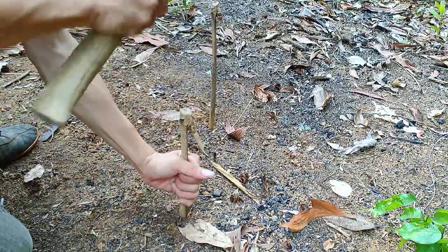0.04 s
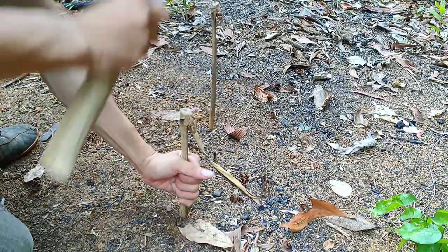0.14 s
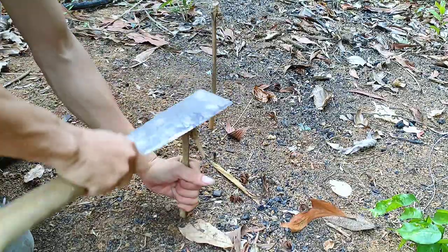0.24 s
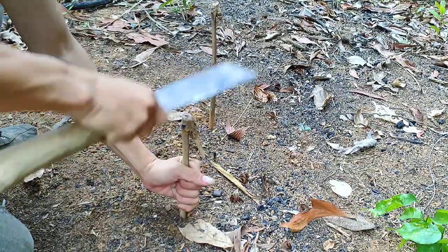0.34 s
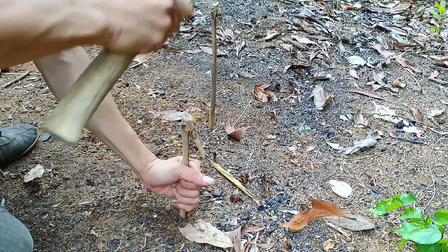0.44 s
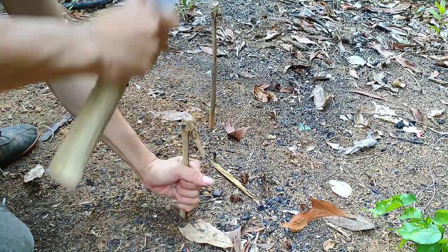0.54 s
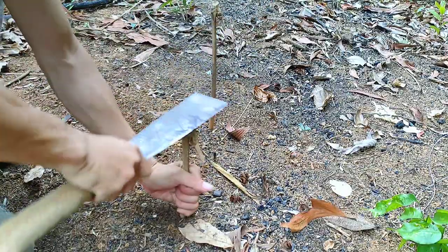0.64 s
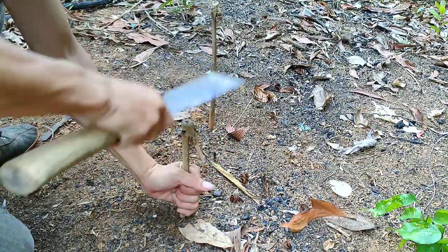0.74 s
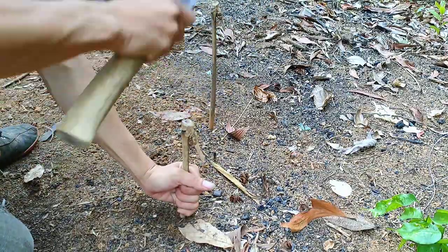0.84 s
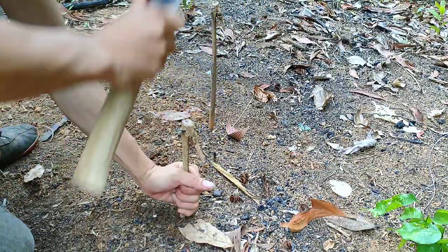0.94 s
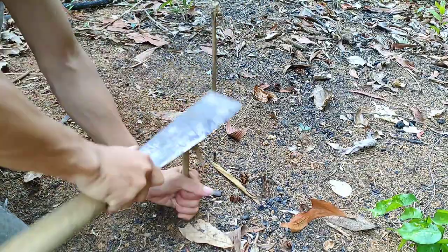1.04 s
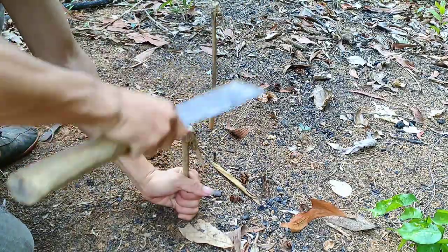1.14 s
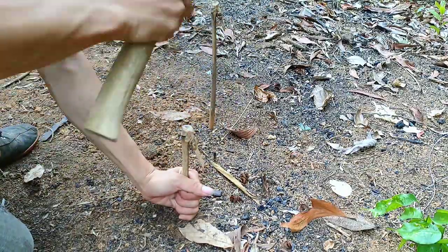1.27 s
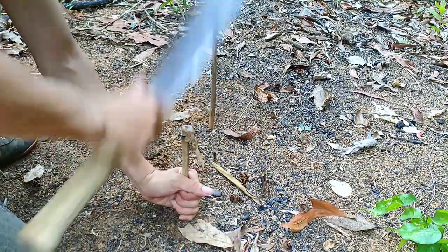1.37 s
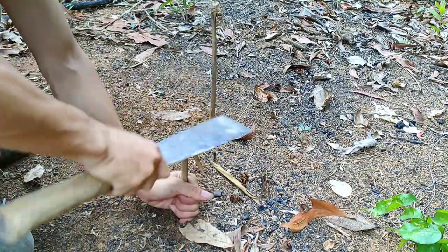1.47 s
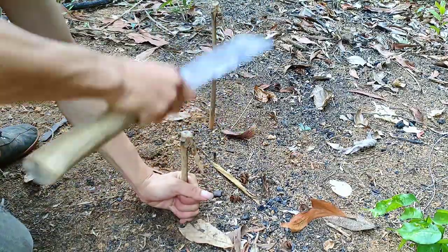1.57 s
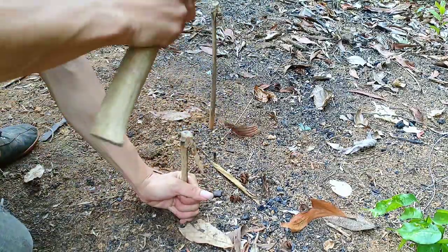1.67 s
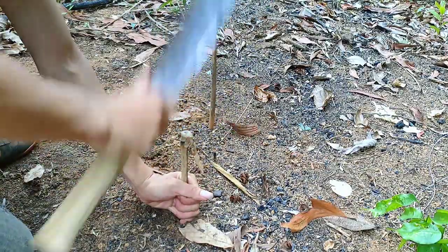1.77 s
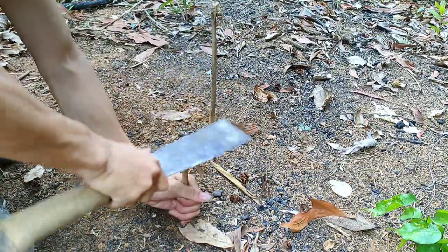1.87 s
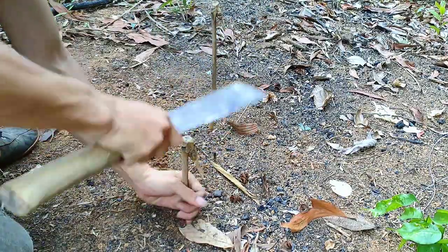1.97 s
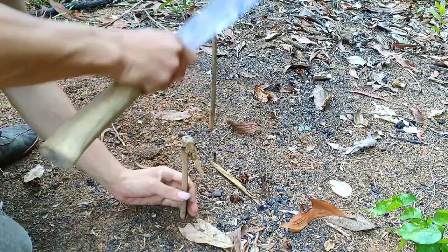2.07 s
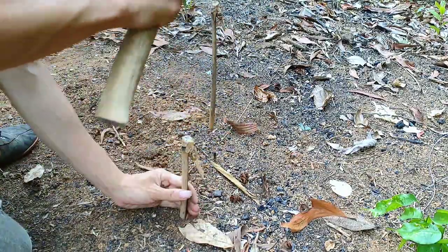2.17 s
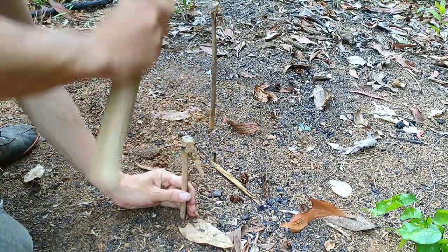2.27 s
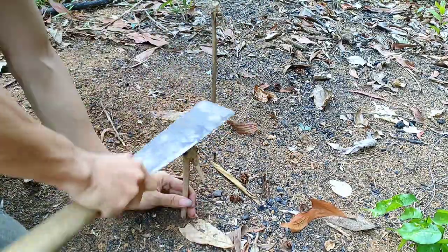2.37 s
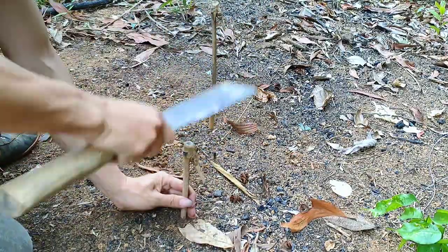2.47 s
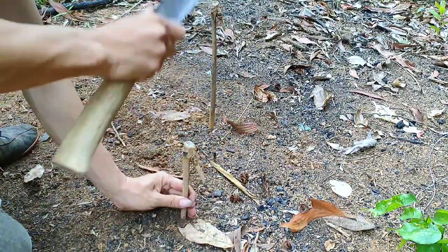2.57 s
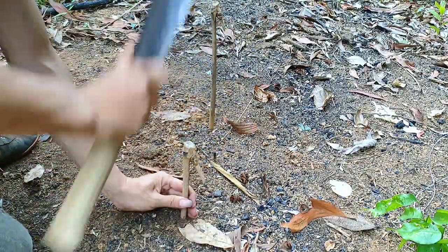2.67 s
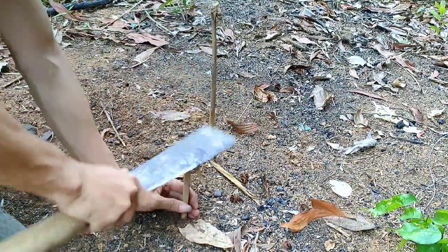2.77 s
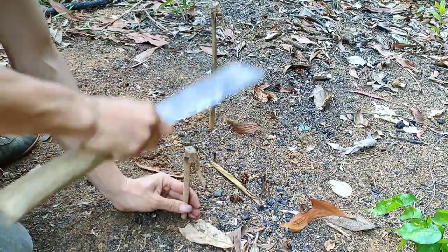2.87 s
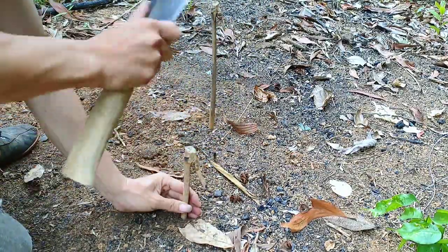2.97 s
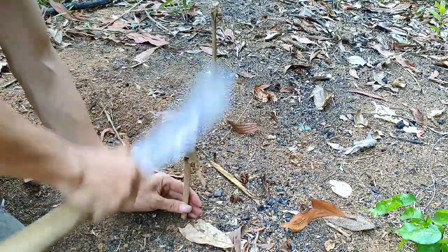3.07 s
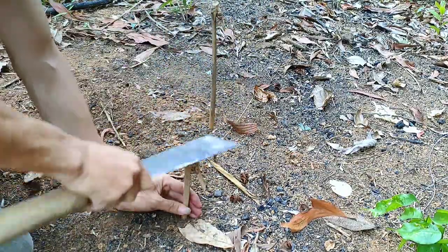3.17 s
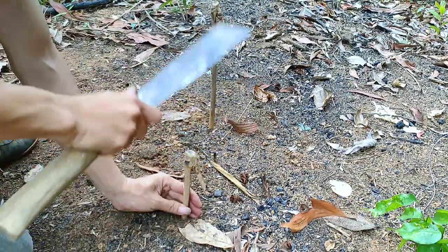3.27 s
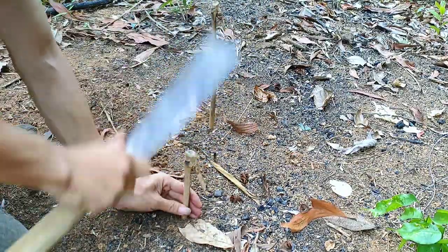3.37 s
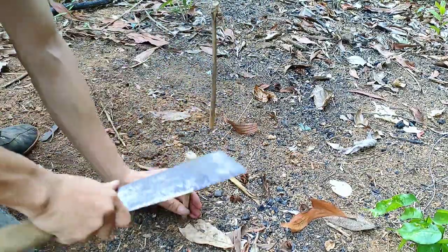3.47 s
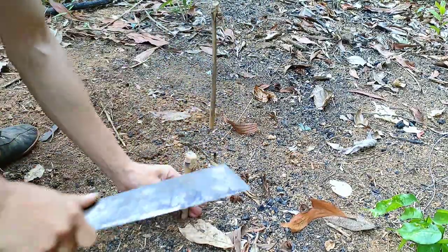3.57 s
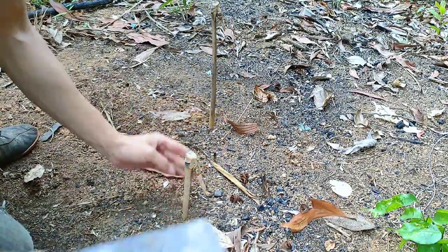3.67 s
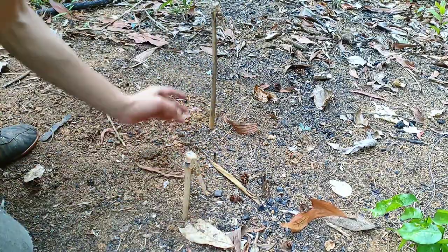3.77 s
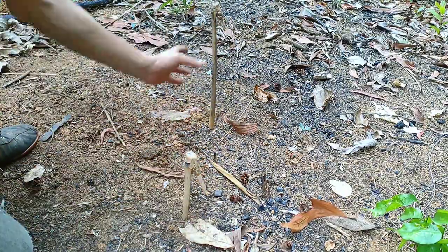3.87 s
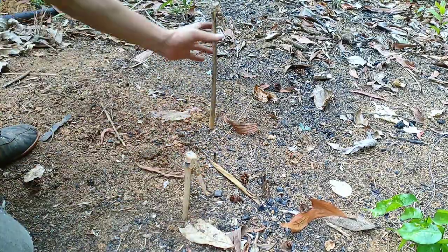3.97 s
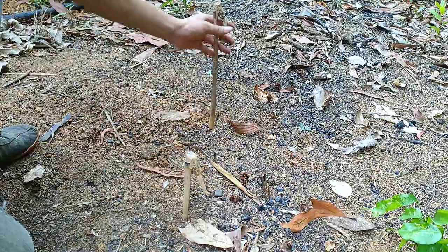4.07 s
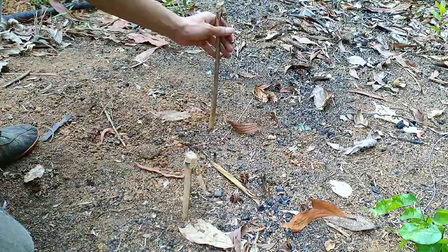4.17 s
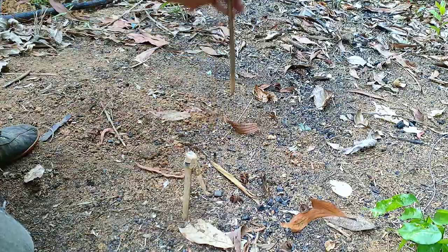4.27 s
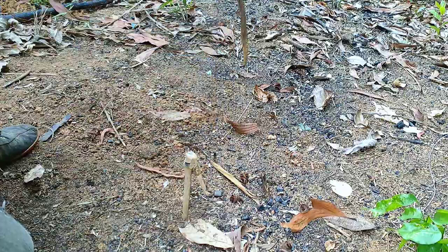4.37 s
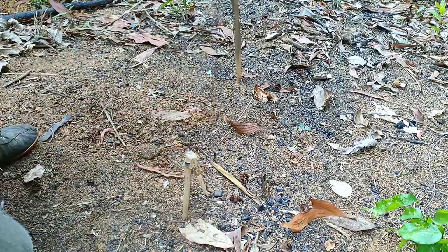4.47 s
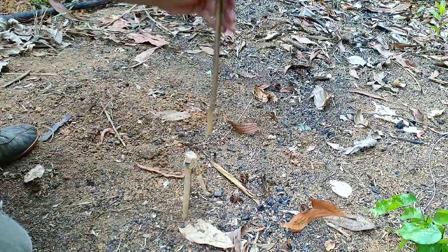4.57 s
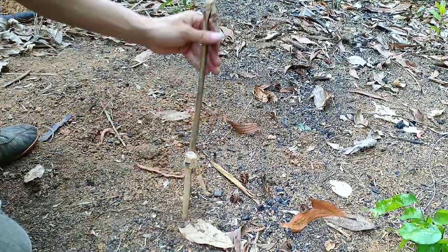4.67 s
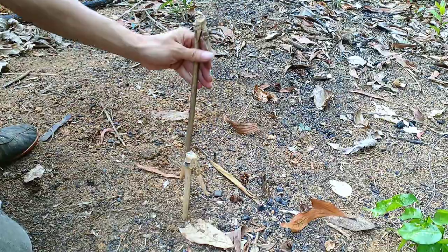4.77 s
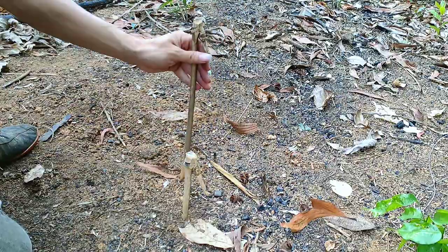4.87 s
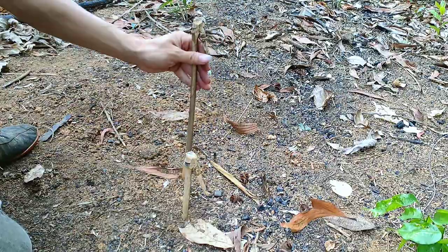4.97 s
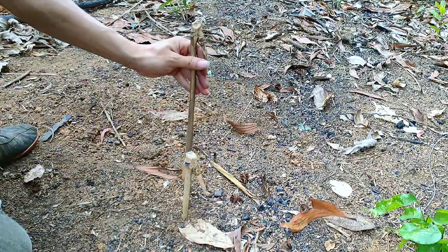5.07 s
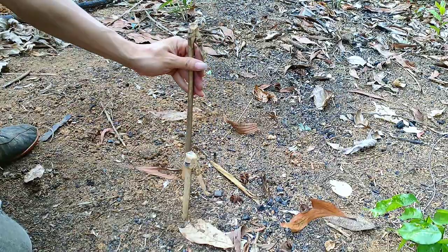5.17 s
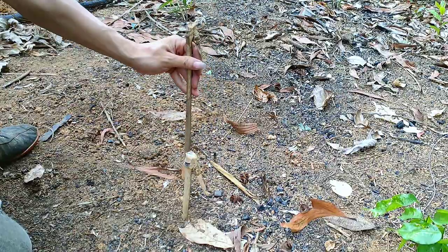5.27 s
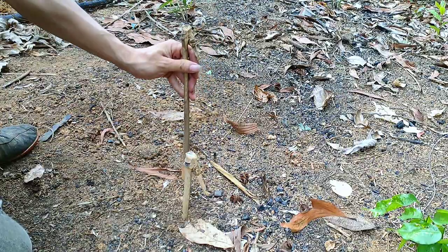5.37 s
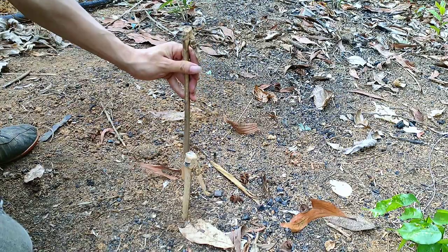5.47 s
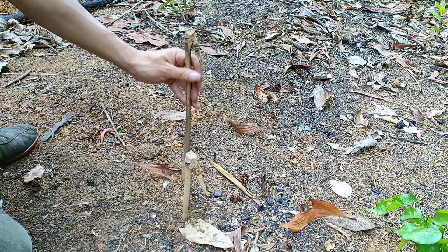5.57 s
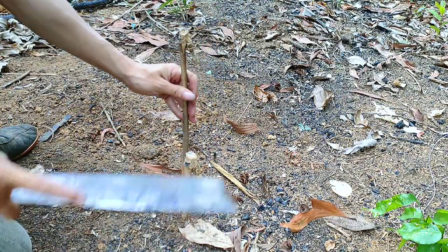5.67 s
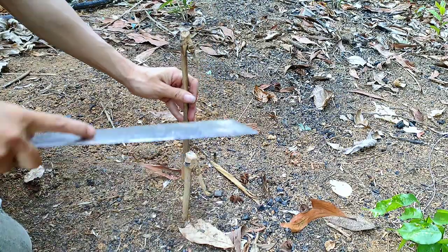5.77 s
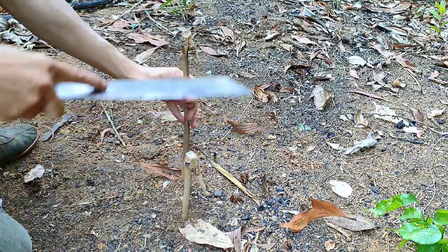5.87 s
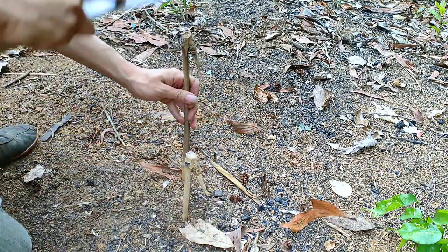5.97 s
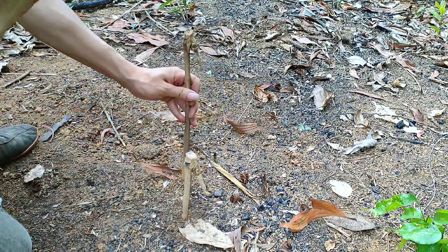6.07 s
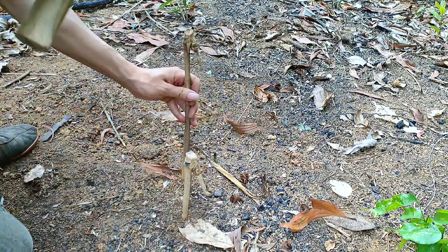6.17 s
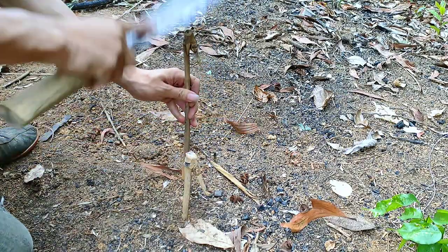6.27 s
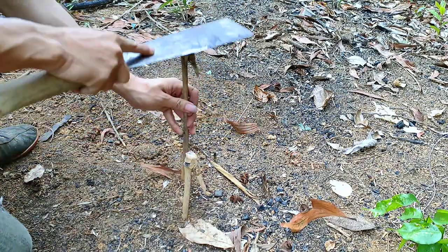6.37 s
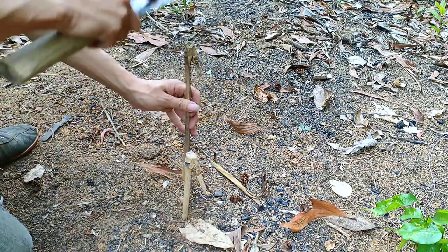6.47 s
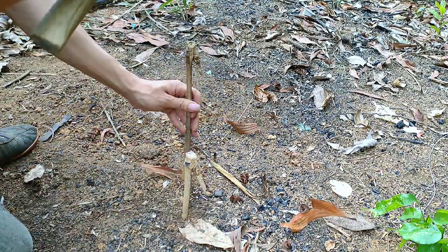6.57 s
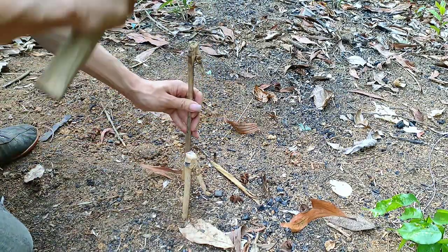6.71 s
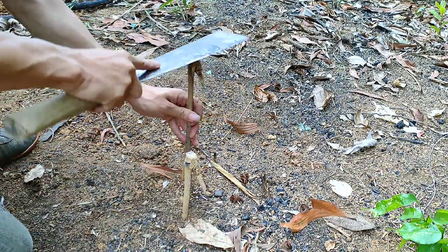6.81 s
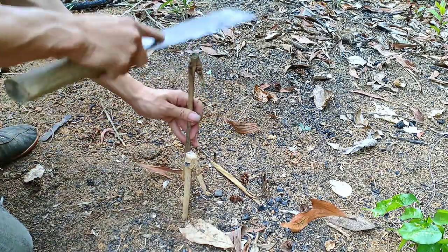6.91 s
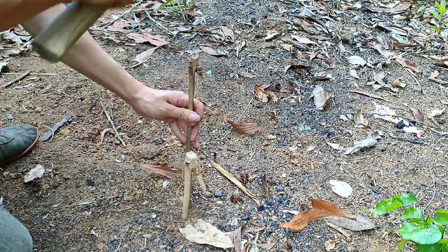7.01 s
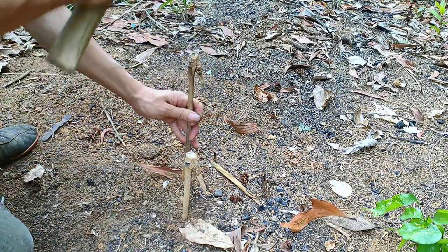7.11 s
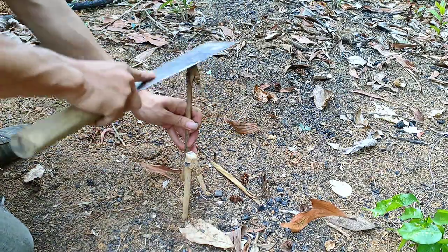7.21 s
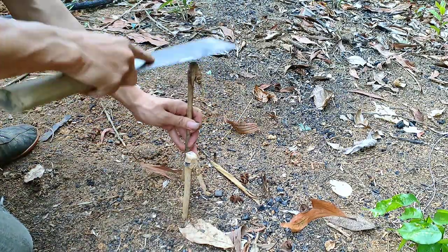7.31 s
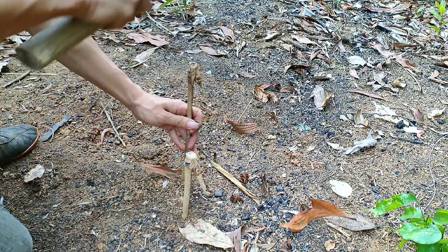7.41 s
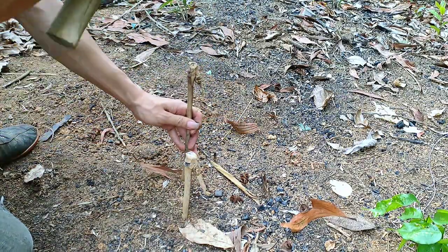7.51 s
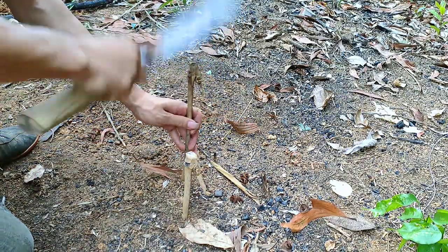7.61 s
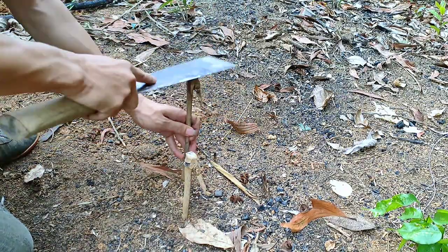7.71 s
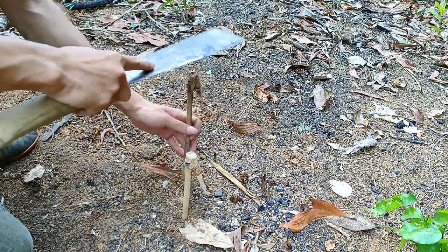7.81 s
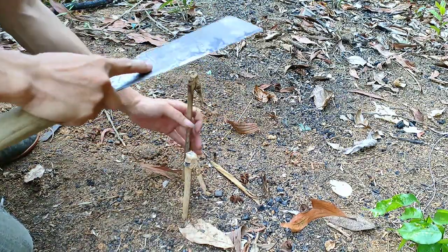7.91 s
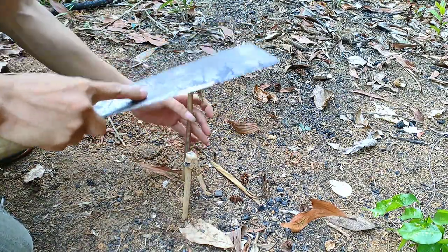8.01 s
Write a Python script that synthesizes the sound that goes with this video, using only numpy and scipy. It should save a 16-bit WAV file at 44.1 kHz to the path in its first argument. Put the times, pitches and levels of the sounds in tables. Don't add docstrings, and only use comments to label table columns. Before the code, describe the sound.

Sharp wooden knocks as a blade's flat drives thin stakes into soil, with quick woodland echo over steady chirring insects and a faint distant bird.

```python
import sys
import numpy as np
from scipy import signal
from scipy.fft import rfft
from scipy.io import wavfile
from scipy.ndimage import uniform_filter1d

SR = 44100
rng = np.random.default_rng(int(sys.argv[2]) if len(sys.argv) > 2 else 0)


def generate_wav(signal):
    frames = np.transpose(np.atleast_2d(signal))
    scaled = np.clip(frames, -1, 1) * 32767
    pcm = np.round(scaled).astype(np.int16)
    wavfile.write(sys.argv[1], SR, pcm)


def boost_factor(decibels):
    exponent = np.asarray(decibels, float) / 20
    return 10 ** exponent


N = 355005

# (time [s], peak [dB], stake tone [Hz], weight [dB], flatness of the landing [dB])
BLOWS = [(0.3112, -5, 1765, 6.5, 6), (0.7132, -2.5, 2150, 2.5, 5), (1.1169, -6, 2270, -16.5, 7),
         (1.5122, -2.5, 2004, -6, 17.5), (1.9175, -3, 4107, -6, 7.5), (2.4554, -3.5, 2278, -25.5, 17.5),
         (2.8362, -3.5, 3060, -31, 13), (3.2002, -3, 2420, 0.5, 13), (3.5145, -5.5, 2120, -18.5, 12),
         (6.3997, -2.5, 1300, -6, -10), (6.8721, -1, 1484, -7, -5.5), (7.2976, -3, 3760, -20, 9),
         (7.7316, -2, 3800, -12.5, 9)]
# (time before the start [s], level [dB])
EARLIER_BLOW = (.1, -15.5)
# (thud [dB], slap [dB], echo [dB], far echo [dB], air push left [dB], air push right [dB])
STAKES = [
    (-21.5, -21, -1.5, -51.5, -27.5, -36),
    (-24, -19, -23, -39, -54.5, -60),
]
# (frequency [Hz], level per weight [dB/dB], level per flatness [dB/dB], extra on long stake [dB])
LANDING = [(300, 1, 0, -0.5), (1300, -0.22, 0.48, 4), (2596, -0.17, 0.46, 8), (4810, 0, 0.42, 5),
           (8200, -0.5, 0.05, 0), (13000, 0, 1, 5.5)]
# (frequency [Hz], level [dB])
CRACK = [(90, -21), (300, -12), (1100, -9), (2400, -6.5), (4800, -1.5), (8000, -2.5), (9800, -10.5),
         (11500, -26.5), (15000, -24.5), (16800, -44.5)]
# (frequency [Hz], level [dB], decay t60 [s])
HELD_STEEL = [
    [(970, -47, .09), (1378, -47, .06), (4570, -32, .1), (5443, -40, .04), (6315, -42, .05),
     (7270, -38, .05), (8335, -33, .05), (9520, -36, .02), (10660, -54, .08)],
    [(970, -44, .06), (1310, -30, .04), (1507, -46, .08), (2800, -36, .03), (4570, -46, .08),
     (6342, -38, .03), (7270, -40, .04), (8325, -37, .045), (9464, -38, .015)],
]
# (frequency [Hz], level [dB])
ECHO = [(500, -48), (900, -33), (2400, -1.5), (3800, -4.5), (7100, -1.5), (8500, -1.5), (9800, -7.5),
        (11000, -21), (15300, -20.5), (15900, -59)]
# (time [s], peak [dB], brightness [dB], ring [dB])
BOUNCES = [(0.355, -37.5, -1, -38), (0.75, -36, -10, -42), (0.768, -45, -10, -27), (1.17, -35, -28, -13),
           (1.5676, -30.5, -1, -19), (1.9864, -36, -23, -10), (2.894, -37, -10, -25), (3.573, -60, 2, -15),
           (5.543, -43, 2, -19), (6.43, -35, 7.5, -23.5), (7.344, -43.5, -18, -20), (7.8, -43, -16, -32)]
# (time [s], peak [dB], scrape t60 [s], ring [dB], thud [dB])
TOUCHES = [
    (3.8989, -29, 0.053, -7.5, 4.5),
    (3.907, -34, 0.013, 1.5, -1),
    (4.0408, -27.5, 0.0283, -6, 2.5),
    (4.106, -49, 0.023, -5, 13),
    (5.486, -45.5, 0.02, -10, -3),
    (5.5076, -47.5, 0.034, -9, 2),
    (5.5491, -49, 0.036, -19, -3),
]
# (frequency [Hz], level [dB], decay t60 [s])
FREE_STEEL = [(2750, -34, 0.19), (3270, -12, 0.018), (4544, -12, 0.072), (5310, -18, 0.11),
              (6100, -19, 0.074), (7267, -7, 0.12), (8335, -0.5, 0.13), (9500, -20, .05),
              (10900, -12, 0.07), (12000, -15, 0.11), (13430, -13, 0.045), (14750, -11, 0.05)]
# (time [s], peak [dB])
TICKS = [(4.6823, -41.5), (4.995, -48.5), (5.216, -42), (6.0251, -44), (6.0943, -44.5), (6.111, -41)]
# (time [s], hold [s], level [dB])
RUSTLE = [(2.066, .03, -53.5), (2.306, 0.07, -64.5), (4.13, 0.018, -66.5), (4.288, 0.017, -61.5),
          (4.58, .015, -64.5), (4.683, 0.022, -61), (4.887, 0.046, -59.5), (5.015, 0.1, -59),
          (5.169, 0.022, -61), (5.209, 0.007, -51.5), (5.33, 0.011, -77), (5.431, .13, -57),
          (5.632, 0.13, -62), (5.795, 0.13, -67), (5.995, .015, -70), (6.083, .03, -63),
          (6.285, 0.018, -64), (6.678, 0.16, -67)]
# (frequency [Hz], level [dB])
LEAF = [(1500, -18), (4000, -5), (8500, 3), (12000, -4.5), (15300, 0.5), (15800, -55)]
# (time [s], hold [s], held note [Hz], rise [Hz], level [dB])
BIRD = [
    (2.411, 0.038, 2930, -0.5, -53.5),
    (2.982, 0.046, 2853, 1899, -58),
    (4.714, 0.12, 2630, 2510.5, -65.5),
    (6.708, .006, 2960, 1556.5, -57),
    (7.23, 0.067, 2936, -0.5, -53.5),
]
# (start [s], loudest stroke [s], end [s], level [dB])
CRICKET = [(1.688, 1.897, 2.5, -70.5), (2.082, 2.345, 2.4, -74), (3.597, 3.771, 3.95, -70.5),
           (4.0, 4.579, 4.86, -68), (5.798, 5.971, 6.42, -66.5), (6.46, 6.831, 7.2, -66.5)]
# (frequency [Hz], width [Hz], level [dB], left over right [dB])
CHOIR = [(7148, 140, -62, -8.5), (7438, 700, -57.5, -5.5), (7785, 150, -62.5, -4), (6920, 780, -63, -3.5),
         (4830, 830, -68.5, -5), (5390, 560, -65.5, -4.5), (10260, 2200, -75, 1)]
# (time [s], level [dB])
CHOIR_SWELL = [(0, 3), (1, 1), (2.999, 0.5), (3.5, 2.5), (4.7, 0.5), (5.2, 2.5), (5.7, 1), (6.3, 1.5),
               (7.1, -0.5), (8.05, 1.5)]
# (time [s], frequency [Hz], level [dB])
HUM = [(0, 43.7, -92), (2, 45.13, -75.5), (4, 44.2, -68), (4.998, 44.45, -72), (5.498, 45.5, -65.5),
       (6, 47.6, -63.5), (6.499, 44.7, -91.5), (8.05, 48.7, -71)]
# (frequency [Hz], level [dB])
AIR = [(15, -28.5), (30, -7), (45, -5.5), (110, -9), (200, -19.5), (350, -21), (1000, -25.5), (2800, -25.5),
       (4000, -20), (6300, -29), (8700, -44), (12000, -31.5), (15300, -24.5), (16000, -68.5)]
# (frequency [Hz], likeness [0 to 1])
SAME = [(60, 1), (180, 0.6), (550, 0.11), (1650, 0), (5000, 0), (15000, 0.0038)]

AIR_DB = -63.5
SWAP_S = 5
THUD_PER_WEIGHT, SLAP_PER_FLAT, ECHO_PER_FLAT, PUSH_PER_WEIGHT = 0.19, 1.4, 0.35, -0.13
LIGHT_DB = -5.5
LAG = 4
STIR_DB_PER_S, SETTLE_DB_PER_S = 602, 467
LOWER_SWELL = 1.6
STROKES_PER_S, CRICKET_HZ, HZ_PER_DB, SWELL_DB_PER_S, FADE_DB_PER_S = 28.7, 3570, 14.5, 29.5, 28.5
SCOOP_HZ, SCOOP_S = 200, .006
RISE_S, RISE_SHAPE, RISE_DB, TOP_S = .066, 1.7, 14, .012
DROP_S, DROP_FROM_HZ, DROP_TO_HZ, DROP_DB, DROP_FADE_DB = 0.054, 3300, 2050, 1.5, -19.5


def machete():
    out, t = np.zeros((2, N)), np.arange(3000) / SR
    push = t / 0.0014 * np.exp(1 - t / 0.0014) - 0.17 * t / 0.011 * np.exp(1 - t / 0.01)
    earlier_s, earlier_db = EARLIER_BLOW
    strikes = [(-earlier_s, earlier_db - 34, earlier_db - 34)]
    for s, db, hz, weight_db, flat_db in BLOWS:
        long = s > SWAP_S
        thud_db, slap_db, echo_db, far_db, left_db, right_db = STAKES[long]
        thud_db = thud_db + THUD_PER_WEIGHT * weight_db
        slap_db = slap_db + SLAP_PER_FLAT * flat_db
        echo_db = echo_db + ECHO_PER_FLAT * flat_db
        landing = [(f, a * weight_db + b * flat_db + c * long) for f, a, b, c in LANDING]
        add(out, s, knock(db, hz, thud_db, slap_db, landing, long))
        push_gain = boost_factor([[left_db + PUSH_PER_WEIGHT * weight_db], [right_db]])
        right_sign = np.sign(weight_db - LIGHT_DB)
        add(out, s, push_gain * [[1], [1.9 * right_sign]] * push)
        strikes.append((s, -42.5 + 0.13 * echo_db, far_db + echo_db))
    return out + trees(strikes)


def knock(db, hz, thud_db, slap_db, landing, long):
    t = np.arange(6000) / SR
    rise = np.minimum(t / 0.00071, 1) ** 2
    snap = boost_factor(5) * (signal.unit_impulse(len(t), 16) - 0.83 * signal.unit_impulse(len(t), 11))
    splinter = burst(t, 0.0032, 0.74) + boost_factor(-15) * burst(t, 0.014, 0.11)
    crack = coloured(snap + rise * splinter, CRACK)
    stake = ring([(hz, -3, .006)], t)
    slap_gain = boost_factor(slap_db + np.array([[3.5], [-4.5]]))
    slap = slap_gain * ring([(7520, -8.0, 0.0063), (8880, -14.0, 0.0033)], t)
    blow = boost_factor(-4.5) * crack + rise * (stake + slap)
    grid = np.geomspace(100, 17000, num=36)
    stake_lift_db = 3.42 * np.exp(-(np.log(grid / hz) / 0.27) ** 2)
    colour_db = read(CRACK, grid) + read(landing, grid) + stake_lift_db
    blow = coloured(blow, list(zip(grid, colour_db - own_colour(from_left(blow, LAG), grid))))
    thud = boost_factor(thud_db) * ring([(197, -14.5, 0.0088), (450, -4, 0.0081), (704, -22.5, 0.012)], t)
    steel = coloured(ring(HELD_STEEL[long], t), landing)
    body = rise * (thud + boost_factor(-2.5) * steel) * (t < .13)
    return boost_factor(db + 6.5) * from_left(blow / abs(blow).max() + body, LAG)


def trees(strikes):
    t = np.arange(SR // 2) / SR
    near = boost_factor(-60 * t / 0.52) * np.clip((t - .008) / 0.0027, .3, 1)
    late = t - .086
    far = boost_factor(5.5 - 60 * late / .5) * np.clip(late / 0.019, 0, 1)
    tails = []
    for shape in (near, far):
        for _ in range(3):
            clumps_db = 2.5 * evened(uniform_filter1d(rng.standard_normal(len(t)), 400))
            scatter = rng.standard_normal((2, len(t))) * boost_factor(clumps_db)
            tails.append(coloured(scatter, ECHO) * shape)
    out = np.zeros((2, N + SR))
    for k, (s, near_db, far_db) in enumerate(strikes):
        add(out, s + 1, boost_factor(near_db) * tails[k % 3] + boost_factor(far_db) * tails[3 + k % 3])
    return out[:, SR:]


def handling():
    return rebounds() + blade_on_ground() + leaves_and_grit()


def rebounds():
    out, t = np.zeros((2, N)), np.arange(8000) / SR
    for s, db, bright_db, ring_db in BOUNCES:
        colour = [(80, -7), (300, 8.0), (900, 0), (2200, bright_db), (5000, 3 * bright_db), (9000, -65.5)]
        dull = coloured(burst(t, 0.026, 0.974), colour)
        wood = boost_factor(ring_db) * ring([(980, 0.005, 0.085)], t)
        add(out, s, boost_factor(db) * from_left(dull + wood))
    return out


def blade_on_ground():
    out, t = np.zeros((2, N)), np.arange(8000) / SR
    for s, db, t60, ring_db, thud_db in TOUCHES:
        colour = [(100, thud_db - 0.5), (600, thud_db), (1300, thud_db - 11.5), (3000, -13.5),
                  (8000, -1.5), (11500, -2.5), (14500, -6.5), (16000, -19)]
        scrape = coloured(burst(t, t60, 0.41), colour)
        steel = boost_factor(ring_db + 2.5) * ring(FREE_STEEL, t)
        add(out, s, boost_factor(db) * (scrape + steel) * np.minimum(t / 0.000338, 1))
    return out


def leaves_and_grit():
    out, t = np.zeros((2, N)), np.arange(8000) / SR
    for s, db in TICKS:
        add(out, s, boost_factor(db) * coloured(burst(t, 0.015, 0.22), LEAF))
    grain_db = 3.5 * evened(uniform_filter1d(rng.standard_normal(N), 130))
    leaves = evened(coloured(rng.standard_normal((2, N)) * boost_factor(grain_db), LEAF))
    t = np.arange(N) / SR
    for s, hold, db in RUSTLE:
        before, after = np.maximum(s - t, 0), np.maximum(t - s - hold, 0)
        out += leaves * boost_factor(db - STIR_DB_PER_S * before - SETTLE_DB_PER_S * after)
    return out


def bird():
    dry = np.zeros(N)
    for s, hold, hz, rise_hz, db in BIRD:
        t = np.arange(0, hold + (RISE_S + TOP_S) * (rise_hz > 0), 1 / SR)
        up = np.clip((t - hold) / RISE_S, 0, 1)
        glide_hz = hz - SCOOP_HZ * np.exp(-t / SCOOP_S) + rise_hz * up ** RISE_SHAPE
        add(dry, s, whistle(glide_hz, db + RISE_DB * np.sin(.72 * np.pi * up)))
        down = np.arange(0, 1, 1 / (DROP_S * SR))
        drop_hz = DROP_TO_HZ + (DROP_FROM_HZ - DROP_TO_HZ) * (1 - down) ** 2.0
        add(dry, s + t[-1], whistle(drop_hz, db + DROP_DB + DROP_FADE_DB * down))
    t = np.arange(9000) / SR
    tail = rng.standard_normal((2, len(t))) * boost_factor(-60 * t / 0.14)
    wet = signal.oaconvolve(dry[None], tail / np.linalg.norm(tail[0]), axes=1)[:, :N]
    return from_left(np.array([dry, dry]), 3) + boost_factor(-1.5) * wet


def whistle(hz, db):
    waver = 1 + 0.011 * evened(uniform_filter1d(rng.standard_normal(len(hz)), 120))
    tone = np.sin(2 * np.pi * np.cumsum(hz * waver) / SR)
    return boost_factor(db - 2.5) * tone * signal.windows.tukey(len(hz), .2)


def cricket():
    out = np.zeros((2, N))
    for start, top, end, db in CRICKET:
        t = np.arange(start, end, 1 / SR) - top
        effort_db = np.minimum(SWELL_DB_PER_S * t, -FADE_DB_PER_S * t)
        stroke = (t * STROKES_PER_S + .5) % 1 - .5
        throb = np.cos(np.pi * stroke) ** 2.5
        slant_hz = (CRICKET_HZ + HZ_PER_DB * effort_db) * (1 - 0.06 * stroke)
        clear = np.sin(2 * np.pi * np.cumsum(slant_hz) / SR + np.array([[0], [1.6]]))
        blur = evened(resonate(rng.standard_normal((2, len(t))), slant_hz, 210))
        chirps = (throb + 0.13) * clear + 0.35 * (throb + 0.86) * blur
        add(out, start, boost_factor(db + effort_db + 12.0) * chirps)
    return out


def insect_choirs():
    t, out = np.arange(N) / SR, np.zeros((2, N))
    swell_db = np.interp(t, *np.transpose(CHOIR_SWELL))
    for hz, width, db, pan_db in CHOIR:
        clicks = rng.standard_normal((2, N)) * (rng.random(N) < 2500 / SR)
        swell = swell_db * (1 if hz > 6000 else LOWER_SWELL)
        level_db = db + swell + pan_db / 2 * np.array([[1], [-1]])
        out += boost_factor(level_db) * evened(resonate(resonate(clicks, hz, width), hz, width))
    return out


def motor():
    s, hum_hz, hum_db = np.transpose(HUM)
    t = np.arange(N) / SR
    phase = 2 * np.pi * np.cumsum(np.interp(t, s, hum_hz)) / SR
    return boost_factor(np.interp(t, s, hum_db)) * np.sqrt(2) * np.sin(phase)


def air():
    frames, hz = N // 512 + 5, np.fft.rfftfreq(2048, 1 / SR)
    a, b, c, d, patches = rng.standard_normal((frames, 1025, 5)).T
    patches = evened(uniform_filter1d(uniform_filter1d(patches, 20, 0), 8, 1))
    same = np.clip(read(SAME, hz), -1, 1)[:, None]
    left = a + 1j * b
    right = same * left + np.sqrt(1 - same ** 2) * (c + 1j * d)
    z = np.array([left, right]) * boost_factor(read(AIR, hz)[:, None] + 1.8 * patches)
    wash = signal.istft(z, nperseg=2048, noverlap=1536)[1][:, :N]
    return boost_factor(AIR_DB) * evened(wash)


def evened(x):
    return x / np.sqrt(np.mean(x ** 2) + 1e-20)


def read(points, hz):
    f, value = np.transpose(points)
    return np.interp(np.log(hz + 1), np.log(f + 1), value)


def add(mix, s, sound):
    part = mix[..., round(s * SR):][..., :sound.shape[-1]]
    part += sound[..., :part.shape[-1]]


def coloured(x, points):
    hz = np.abs(np.fft.fftfreq(4096, 1 / SR))
    log_gain = np.log(boost_factor(np.maximum(read(points, hz), -100)))
    taps = np.fft.ifft(np.exp(np.conj(signal.hilbert(log_gain)))).real[:2048]
    taps = taps[None] / np.linalg.norm(taps)
    return signal.oaconvolve(np.atleast_2d(x), taps, axes=1)[:, :x.shape[-1]]


def own_colour(x, hz):
    bins = np.fft.rfftfreq(x.shape[1], 1 / SR)
    power = (abs(rfft(x)) ** 2).mean(0) + 1.5 * abs(rfft(x.mean(0))) ** 2
    near = np.exp(-.5 * (np.log((bins + 1) / hz[:, None]) / .13) ** 2)
    return 10 * np.log10(near @ power / near.sum(1) + 1e-12)


def resonate(x, hz, width):
    turn = np.exp(2j * np.pi * np.cumsum(hz * np.ones(x.shape[-1])) / SR)
    r = np.exp(-np.pi * width / SR)
    return 2 * (turn * signal.lfilter([(1 - r) ** 2], [1, -2 * r, r * r], x / turn)).real


def ring(modes, t):
    hz, db, t60 = np.transpose(modes)[..., None]
    luck = rng.standard_normal((3, 2, len(modes), 1))
    phase = 1.2 * luck[1, 0] + .45 * luck[2]
    level_db = db + 2 * luck[0] - 60 * t / np.maximum(t60, .004)
    return (boost_factor(level_db) * np.sin(2 * np.pi * hz * t + phase)).sum(1)


def burst(t, t60, alike):
    a = rng.standard_normal((3, len(t)))
    noise = alike * a[0] + np.sqrt(max(1 - alike ** 2, 0)) * a[1:]
    return noise * boost_factor(-60 * t / max(t60, .001))


def from_left(x, lead=5):
    return np.array([x[0], np.roll(x[1], round(lead))])


def scene():
    return machete() + handling() + bird() + cricket() + insect_choirs() + motor() + air()


def band_limit(x):
    return signal.sosfilt(signal.butter(12, 16710, fs=SR, output="sos"), x)


def record(dry):
    edge = signal.firwin(255, 16700, window=("kaiser", 9), fs=SR)[None]
    limited = .85 * np.tanh(dry / .85)
    mix = signal.oaconvolve(limited, edge, "same") + .0024
    return band_limit(mix)


dry = scene()
out = record(dry)
generate_wav(out)
```